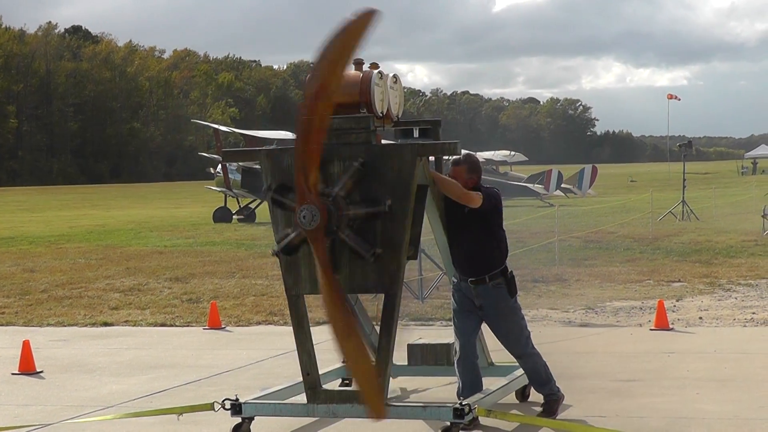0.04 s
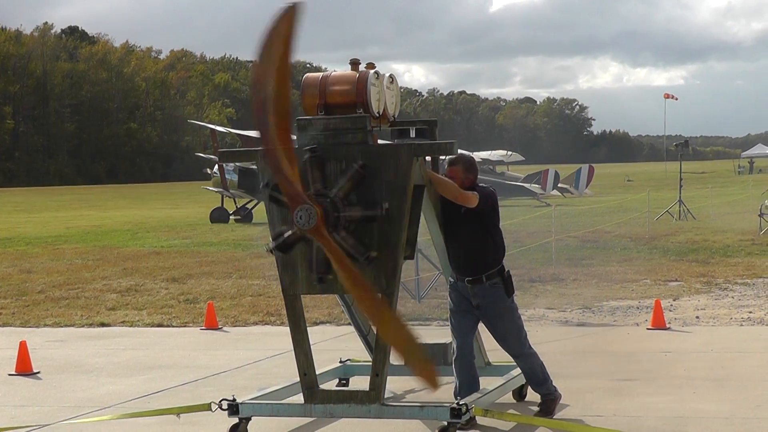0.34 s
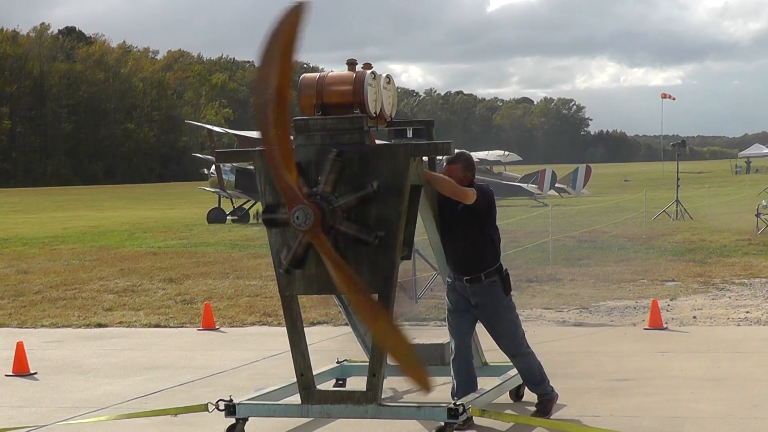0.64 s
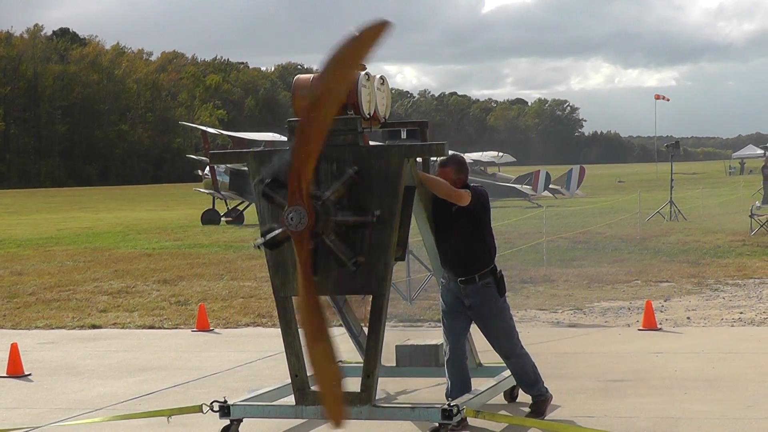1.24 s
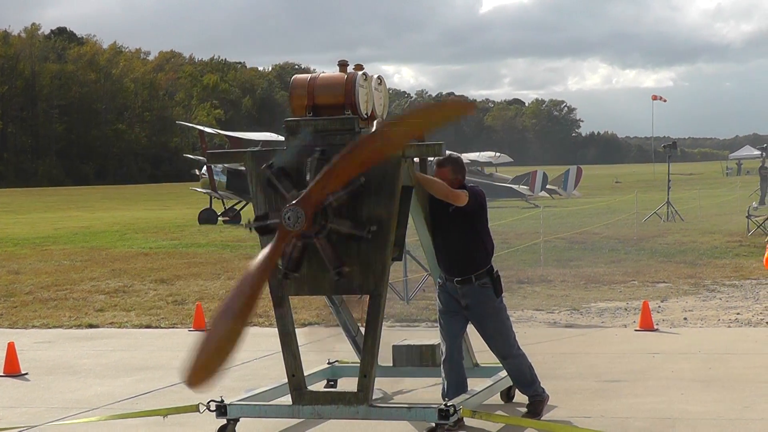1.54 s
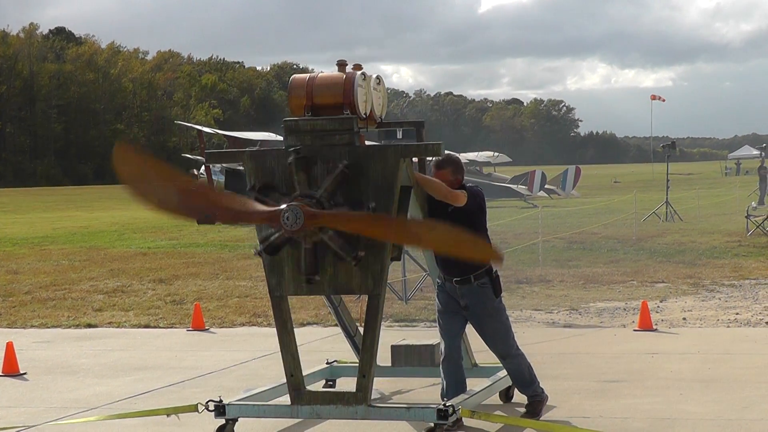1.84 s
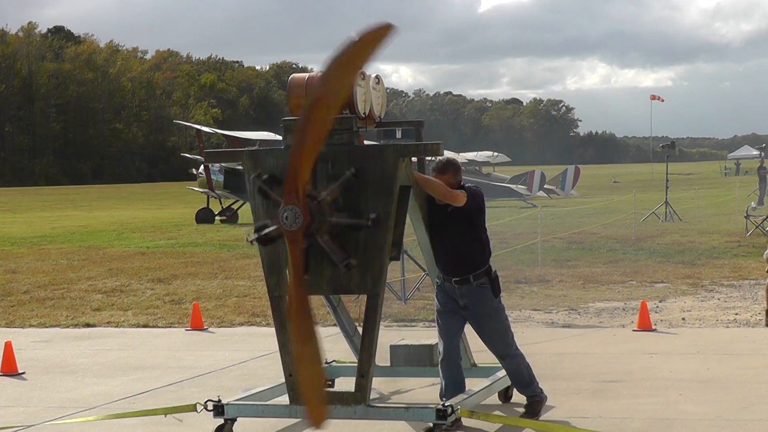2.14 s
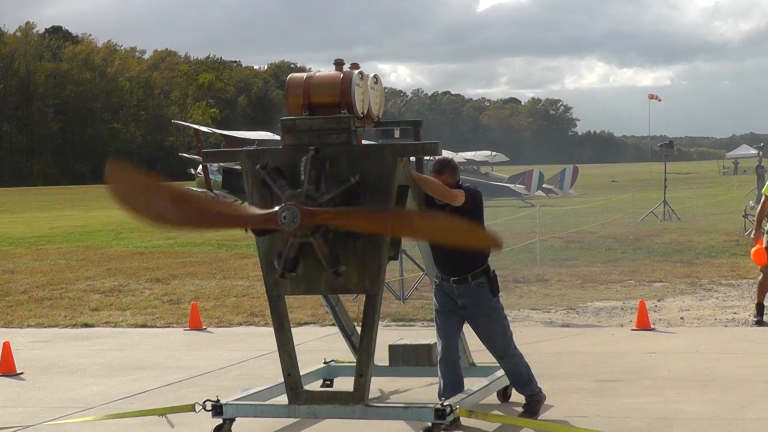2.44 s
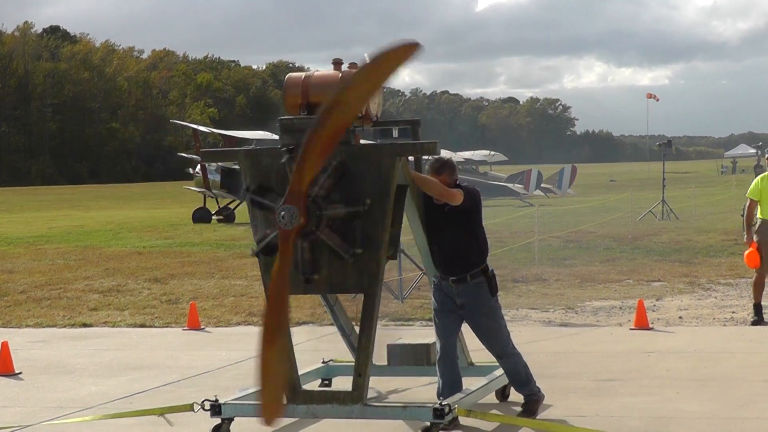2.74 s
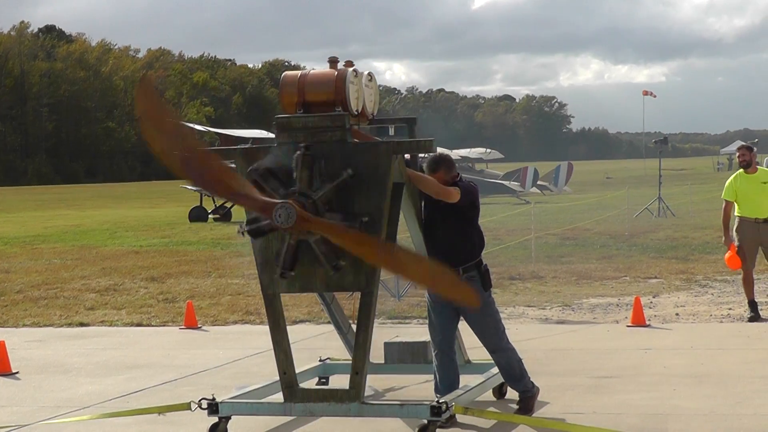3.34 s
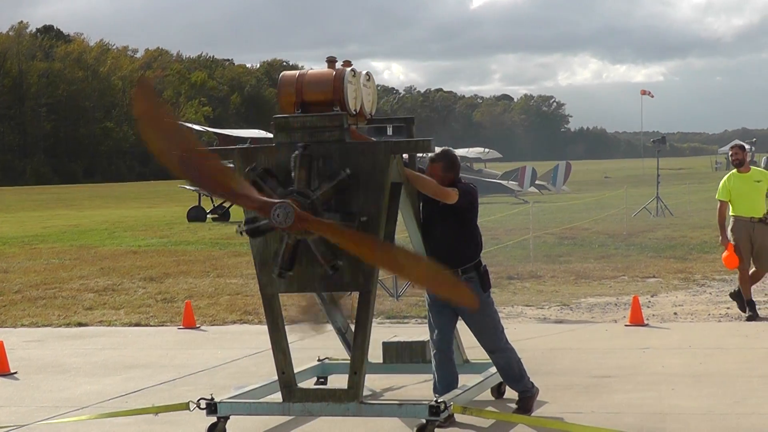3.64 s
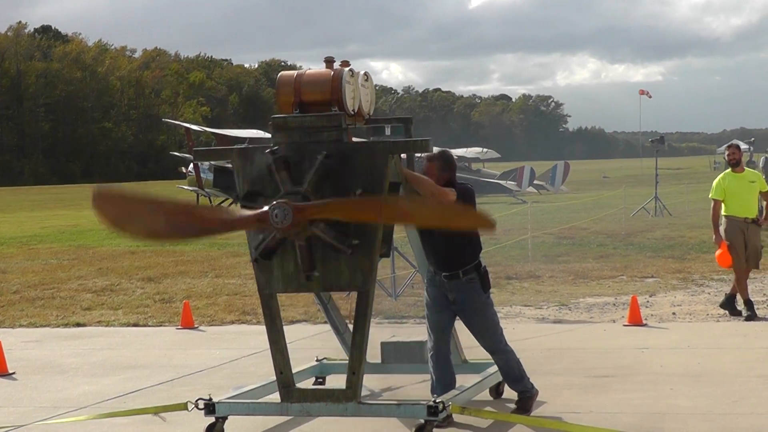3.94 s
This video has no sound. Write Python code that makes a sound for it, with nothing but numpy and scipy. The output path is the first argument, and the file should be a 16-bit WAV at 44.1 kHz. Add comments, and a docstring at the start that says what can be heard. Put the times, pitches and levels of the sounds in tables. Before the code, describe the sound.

A rotary aircraft engine fires in sharp, uneven pops over the soft churn of its propeller.

```python
"""Rotary aircraft engine, firing unevenly

The engine turns slowly on a test stand on an open airfield. Each firing leaves an open exhaust valve
as a sharp spit of gas with a short bark, then a softer hiss; nearby surfaces throw it back. The hardest
pops thud in the microphone. Underneath, the propeller and the spinning cylinders churn the air."""
import sys
import numpy as np
from scipy import signal
from scipy.fft import rfft, irfft
from scipy.io import wavfile
from scipy.ndimage import uniform_filter1d

SR = 44100
rng = np.random.default_rng(int(sys.argv[2]) if len(sys.argv) > 2 else 0)


def wrap_up_sound(samples):
    """Save the sound to the file named by the first command line argument, as 16-bit audio."""
    columns = np.atleast_2d(samples).T
    # keep every value between -1 and 1, then stretch to whole-number steps
    tamed = np.clip(columns, -1, 1)
    steps = np.round(tamed * 32767).astype(np.int16)
    wavfile.write(sys.argv[1], SR, steps)


N = 176400

# tone of the churned air: frequency_hz, level_db
CHURN_COLOUR = [(20, -42), (45, -39), (80, -4.5), (150, -3), (235, 1), (295, -3), (355, -3.5), (450, -10),
                (670, -4.5), (900, -12.5), (1400, -11.5), (1800, -16.5), (2100, -12), (2450, -16),
                (2850, -15), (3300, -15.5), (4500, -17.5), (6700, -12.5), (10000, -22.5), (14000, -29),
                (16000, -37)]
# stereo image of the churn, 1 is mono: frequency_hz, likeness
CHURN_LIKENESS = [(40, 0.27), (200, 0.8), (700, 0.53), (2000, 0.59), (7000, 0.94), (14000, 0.093)]
# the churn sinks as the engine slows: time_s, level_db
CHURN_FADE = [(0, 1.5), (.5, 0), (1, -1), (1.5, -2), (2, -2), (2.5, -3.5), (3, -3), (3.5, -3.5), (4, -4.5)]
# cylinders that fail to fire: start_s, level_db
MISFIRES = [(.022, -40), (.435, -40), (.96, -40.5), (3.061, -38)]
# tone of a misfire: frequency_hz, level_db
MISFIRE_COLOUR = [(20, -48), (100, -7), (300, -23), (620, 13), (1200, -23), (3000, -10), (6500, -11),
                  (10000, -18), (16000, -28)]
# cylinders that fire: start_s, level_db, rise_s, decay_s, bark_db, bark_pitch_hz, afterflow_db
FIRINGS = [(.088, -13, 0.0055, 0.0069, -22.5, 927, -36), (0.1591, -15, 0.0046, 0.0074, -28, 770, -35),
           (0.1919, -18, 0.0071, 0.0072, -33, 900, -32), (0.2277, -15.5, 0.003, 0.0083, -32.5, 710, -39),
           (0.2598, -18, .0064, 0.01, -37, 820, -35.5), (0.2919, -13.5, 0.0032, 0.0055, -33, 700, -38),
           (0.3586, -17, .0085, 0.0055, -36, 1157, -37), (0.5648, -13.5, 0.0028, 0.0081, -26, 790, -40),
           (0.634, -15.5, .0064, 0.0059, -28.5, 732, -37.5), (0.6709, -18, .0022, 0.0088, -37, 810, -33.5),
           (.7028, -16, 0.0041, 0.0088, -29, 710, -40), (.736, -19, .0075, 0.0094, -35, 950, -35),
           (0.7695, -15.5, 0.0035, 0.0088, -39, 790, -37), (0.8383, -16, 0.0035, 0.0091, -32, 1030, -38),
           (1.0469, -12.5, 0.0043, 0.0063, -29, 840, -37.5),
           (1.119, -15.5, 0.0036, 0.0086, -33.5, 723, -40), (1.225, -17, 0.005, 0.012, -31, 915, -40),
           (1.2586, -17, 0.0034, 0.0091, -35, 820, -42), (1.3285, -16, 0.0044, 0.0086, -34, 673, -37.5),
           (1.5431, -14, 0.0048, 0.0071, -26, 836, -40), (1.616, -15.5, 0.0044, 0.009, -33, 720, -42),
           (1.653, -19.5, 0.0084, 0.0069, -37, 815, -40), (1.7243, -16, 0.0062, .0076, -31.5, 880, -32.5),
           (1.7604, -16, 0.0038, 0.0063, -52, 990, -43), (1.831, -30, 0.0085, 0.0059, -57, 970, -58),
           (2.0591, -13, 0.0036, 0.0068, -27.5, 895, -51), (2.095, -34, 0.0084, 0.006, -55, 870, -55),
           (2.1351, -17, 0.0078, 0.0079, -33.5, 734, -40), (2.1752, -17.5, 0.0056, 0.0079, -45, 940, -39),
           (2.2487, -18.5, 0.0056, 0.011, -35, 755, -36.5), (2.283, -28.5, 0.0062, 0.011, -41, 1150, -43),
           (2.359, -14.5, 0.0062, 0.0082, -29, 840, -38), (2.5912, -20, 0.0095, 0.0065, -36.5, 1050, -42),
           (2.6715, -12.8, 0.0056, 0.0053, -26, 733, -39), (2.7102, -17.5, 0.0068, 0.0065, -38, 890, -41),
           (2.788, -17, 0.005, 0.0081, -38, 680, -33), (3.144, -13.5, 0.0058, 0.0067, -22, 990, -42),
           (3.2279, -17, 0.0054, 0.0095, -32.5, 725, -39.5), (3.2689, -19, 0.0054, .013, -34, 890, -40),
           (3.3492, -18, 0.0066, 0.013, -35, 835, -33), (3.4717, -19.5, 0.0079, 0.0085, -39, 870, -44),
           (3.7287, -13.5, 0.005, 0.007, -27.5, 920, -45), (3.815, -16, 0.0051, 0.0085, -33, 730, -49),
           (3.8577, -19, 0.0068, 0.009, -50, 990, -41), (3.8997, -18, 0.0082, 0.0081, -38, 775, -39),
           (3.9403, -20, 0.0063, 0.011, -36.5, 760, -34)]
# tone of the gas jet: frequency_hz, level_db
JET_COLOUR = [(100, -40), (500, -16), (750, -25), (1000, -17.5), (1400, -19.5), (1600, -18.5),
              (1800, -23.5), (2000, -10.5), (2230, -11.5), (2450, -19.5), (2880, -9), (3150, -12),
              (3400, -12), (4300, -8), (4900, -9), (6000, -1), (7200, 1), (8500, -2), (10500, -5),
              (13500, -7.5), (15800, -11), (17000, -87)]
# stereo image of the jet, 1 is mono: frequency_hz, likeness
JET_LIKENESS = [(200, 0.27), (1000, 0.21), (2200, 1), (4500, 1), (7500, 0.91), (12000, 0.8)]
# where the jet sits between the speakers: frequency_hz, left_minus_right_db
JET_PAN = [(200, -6), (1200, -3), (4500, -0.7), (7500, -0.6), (13000, 2)]
# tone of the gruff puff in a bark: frequency_hz, level_db
BARK_COLOUR = [(40, -29), (150, 1), (300, -0.5), (500, -10), (700, -5), (1050, -10.5), (1400, -15),
               (2000, -23), (6000, -37)]
# envelope of the echoes from nearby surfaces: delay_s, level_db
SCATTER_ENVELOPE = [(.008, 11.5), (.02, 2), (.03, 13), (.04, 9), (.052, -3.5), (.064, -4.5), (.1, -12),
                    (.16, -11), (.3, -59), (.5, -60)]
# tone of those echoes: frequency_hz, level_db
SCATTER_EQ = [(100, 13), (700, -5), (2200, 10), (4000, 8.5), (6500, -1.5), (9000, 1.5), (15000, 2.5)]
# thuds of the overloaded microphone: start_s, left_db, right_db
MIC_THUDS = [(0.0925, -14.5, -14.5), (0.164, -23, -21.5), (.2953, -22, -18), (0.5691, -12.5, -12.5),
             (0.7059, -18.5, -18.5), (1.052, -27, -36), (1.547, -19, -13), (1.62, -34, -33),
             (2.061, -29.5, -36), (2.677, -16.5, -19), (3.1494, -20.5, -15), (3.7347, -15, -17)]
# tone of the low flutter in a thud: frequency_hz, level_db
FLUTTER_COLOUR = [(15, -37), (70, -4.5), (150, 0.5), (280, -1.5), (450, -23), (900, -32), (2000, -55),
                  (5000, -81)]


def amp(db):
    """Decibels to gain."""
    return 10 ** (np.asarray(db) / 20)


def unit(x):
    """Scales to rms 1."""
    return x / np.sqrt(np.mean(x ** 2) + 1e-20)


def read(points, hz):
    """Reads a curve on a log-frequency axis."""
    point_hz, value = np.transpose(points)
    return np.interp(np.log(hz + 1), np.log(point_hz + 1), value)


def add(mix, start_s, sound):
    """Lays a mono or stereo sound into the mix."""
    part = mix[:, max(round(start_s * SR), 0):][:, :sound.shape[-1]]
    part += sound[..., :part.shape[1]]


def paired(noises, likeness):
    """Blends two independent noises to stereo: likeness 0 is wide, 1 is mono."""
    likeness = np.clip(likeness, -1, 1)
    mid = np.sqrt((1 + likeness) / 2) * noises[0]
    side = np.sqrt((1 - likeness) / 2) * noises[1]
    return np.array([mid + side, mid - side])


def burst(rise_s, decay_s, snap=1, size=4096):
    """Straight attack, exponential tail; a snap over 1 makes both more abrupt."""
    t = np.arange(size) / SR
    return np.minimum(t / rise_s, 1) ** snap * np.exp(-(np.maximum(t - rise_s, 0) / decay_s) ** snap)


def churn(level_db=-42, patch_db=1.3, swell_db=.9, size=1024):
    """The bed: propeller and cylinders stir the air in drifting patches and quick swells."""
    hop = size // 4
    frames, hz = N // hop + 6, np.fft.rfftfreq(size, 1 / SR)
    grid = (2, frames, len(hz))
    noise = rng.standard_normal(grid) + 1j * rng.standard_normal(grid)
    drift = uniform_filter1d(rng.standard_normal(grid[1:]), size=5, axis=0)
    patches = unit(uniform_filter1d(drift, size=9, axis=1))
    swell = unit(uniform_filter1d(rng.standard_normal(frames), size=6))[:, None]
    moving_eq = amp(read(CHURN_COLOUR, hz) + patch_db * patches + swell_db * swell)
    spectra = paired(noise, read(CHURN_LIKENESS, hz)) * moving_eq
    air = signal.istft(spectra.transpose(0, 2, 1), nperseg=size, noverlap=size - hop)[1][:, :N]
    fade_db = np.interp(np.arange(N) / SR, *np.transpose(CHURN_FADE))
    return unit(air) * amp(level_db + fade_db)


def puff(colour, rise_s, decay_s):
    """A short burst of coloured turbulence, carrying the energy of its envelope."""
    envelope = burst(rise_s, decay_s)
    size = len(envelope)
    log_gain = np.log(amp(read(colour, abs(np.fft.fftfreq(size, 1 / SR)))))
    eq = np.exp(np.conj(signal.hilbert(log_gain)))[:size // 2 + 1]  # minimum phase: a clean attack
    turbulence = irfft(rfft(rng.standard_normal(size) * envelope) * eq)
    return unit(turbulence) * np.sqrt(np.mean(envelope ** 2))


def misfires():
    """Unburnt charges leave with a soft puff."""
    out = np.zeros((2, N))
    for start_s, level_db in MISFIRES:
        add(out, start_s, amp(level_db) * puff(MISFIRE_COLOUR, rise_s=.0081, decay_s=.0061))
    return out


def hiss(size, treble_db, pivot_hz=8300):
    """Gas rushing through the valve: stereo noise of rms 1, its treble tilted about the pivot."""
    hz = np.fft.rfftfreq(size, 1 / SR)
    noise = paired(np.exp(2j * np.pi * rng.random((2, len(hz)))), read(JET_LIKENESS, hz))
    tilt_db = treble_db * np.tanh(2 * np.log2((hz + 1) / pivot_hz)) / 2
    pan_db = np.array([[.5], [-.5]]) * read(JET_PAN, hz)
    return unit(irfft(noise * amp(read(JET_COLOUR, hz) + tilt_db + pan_db)))


def jet(rise_s, decay_s, treble_db, rough_db=.6, grain_s=.001):
    """Gas spits from the valve as a ragged burst of hiss."""
    envelope = burst(rise_s, decay_s, snap=1.25)
    grain = unit(uniform_filter1d(rng.standard_normal(len(envelope)), round(grain_s * SR)))
    ragged = hiss(len(envelope), treble_db) * amp(rough_db * grain)
    return unit(ragged * envelope) * np.sqrt(np.mean(envelope ** 2))


def bark(pitch_hz, ring_delay_s=.00097, ring_rise_s=.0013):
    """The opening cylinder rings inside a gruff puff: a hollow knock when low, a short crack when high."""
    gruff = amp(-2.5) * puff(BARK_COLOUR, rise_s=.00075, decay_s=.0018)
    t = np.maximum(np.arange(len(gruff)) / SR - ring_delay_s, 0)
    decay_s = .005 * (730 / pitch_hz) ** 4.8  # higher rings die much faster
    envelope = np.minimum(t / ring_rise_s, 1) * np.exp(-np.maximum(t - ring_rise_s, 0) / decay_s)
    return np.sin(2 * np.pi * pitch_hz * t) * envelope + gruff


def exhaust(ground_s=.0053, ground_spread_s=.0009, ground_gain=.31):
    """Each firing layers jet, bark and afterflow; the cylinders move, so each pop has its own echoes."""
    out = np.zeros((2, N))
    for start_s, level_db, rise_s, decay_s, bark_db, bark_pitch_hz, afterflow_db in FIRINGS:
        treble_db = .5 * (level_db + 15)  # weak pops are duller
        spit = amp(level_db + .5) * jet(rise_s, decay_s, treble_db)
        pop = spit + amp(bark_db) * bark(bark_pitch_hz)
        add(out, start_s, pop)
        bounce_s = ground_s + ground_spread_s * rng.uniform(-1.1, 1)
        add(out, start_s + bounce_s, ground_gain * spit)
        add(out, start_s, scatter(pop))
        add(out, start_s + .008, amp(afterflow_db) * afterflow())
    return out


def jolt(delay_s, first_swing_s=.0022, decay_s=.0049):
    """A capsule swings and rebounds, each swing twice as long as the last, with a little low flutter."""
    flutter = puff(FLUTTER_COLOUR, rise_s=.0012, decay_s=.0055)
    t = np.maximum(np.arange(len(flutter)) / SR - delay_s, 0)
    swing = np.sin(np.pi * np.log2(1 + t / first_swing_s)) * np.exp(-t / decay_s)
    return amp(2.5) * uniform_filter1d(swing, size=30) + amp(-17) * flutter


def thuds(lag_s=.00016, push_s=.0017, push_db=-6):
    """The hardest pops jolt the two microphone capsules opposite ways, the weaker side a touch late."""
    out = np.zeros((2, N))
    age = np.arange(4096) / SR / push_s
    pressure_wave = age * (1 - age / 2) * np.exp(1 - age)
    for start_s, left_db, right_db in MIC_THUDS:
        left = amp(left_db) * jolt(lag_s * (left_db < right_db))
        right = amp(right_db) * jolt(lag_s * (right_db < left_db))
        # a lopsided thud also pushes both capsules together, the way of the louder jolt
        push = np.sign(left_db - right_db) * amp(max(left_db, right_db) + push_db) * pressure_wave
        add(out, start_s, np.array([push + left, push - right]))
    return out


def scatter(pop, send_db=-15, size=128):
    """Nearby surfaces throw the pop back as a wide cluster of echoes."""
    t = np.arange(SR // 2) / SR
    predelay_s = SCATTER_ENVELOPE[0][0]
    envelope = amp(np.interp(t, *np.transpose(SCATTER_ENVELOPE))) * (t > predelay_s)
    taps = paired(rng.standard_normal((2, len(t))), likeness=.19) * envelope
    hz, _, spectra = signal.stft(taps / np.linalg.norm(taps[0]), SR, nperseg=size)
    spectra *= amp(read(SCATTER_EQ, hz)[:, None])
    echoes = signal.istft(spectra, SR, nperseg=size)[1]
    return amp(send_db) * signal.fftconvolve(pop, echoes, axes=1)


def afterflow(rise_s=.021, hold_s=.019, release_s=.017, size=8192):
    """The piston pushes out the rest of the gas: a softer, duller hiss until the valve shuts."""
    t = np.arange(size) / SR
    envelope = np.minimum(t / rise_s, 1) * np.exp(-np.maximum(t - rise_s - hold_s, 0) / release_s)
    return hiss(size, treble_db=-9.5) * envelope


def scene():
    """Pops, puffs and thuds over a bed of stirred air."""
    return exhaust() + misfires() + thuds() + churn()


def record(dry):
    """A soft clip rounds off the highest peaks and a low-pass trims the very top."""
    ceiling, cutoff_hz = .8, 16300
    rounded = dry / (1 + (dry / ceiling) ** 4) ** .25
    low_pass = signal.firwin(255, cutoff_hz, window=("kaiser", 9), fs=SR)
    return signal.oaconvolve(rounded, low_pass[None], "same")


dry = scene()
out = record(dry)
wrap_up_sound(out)
```